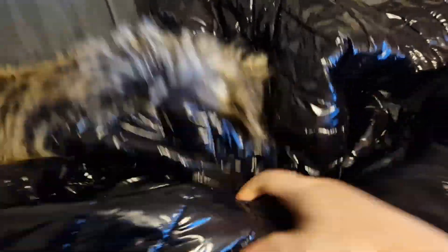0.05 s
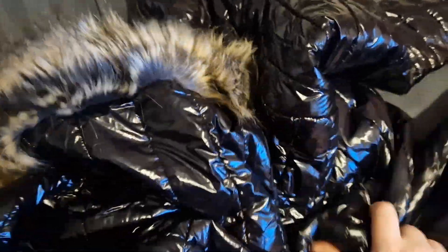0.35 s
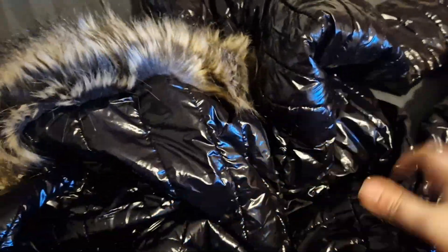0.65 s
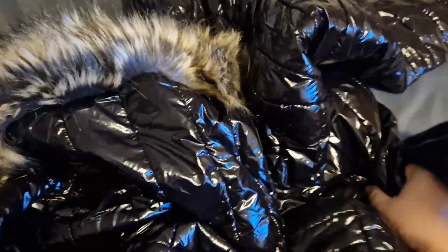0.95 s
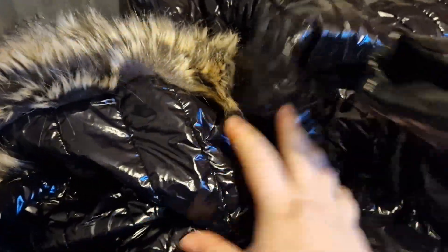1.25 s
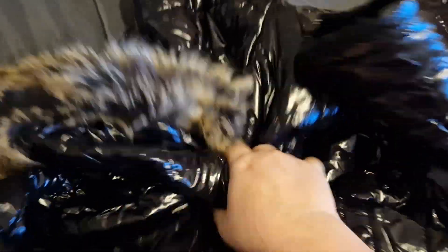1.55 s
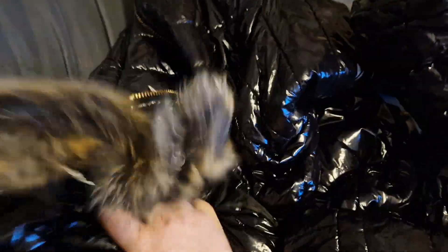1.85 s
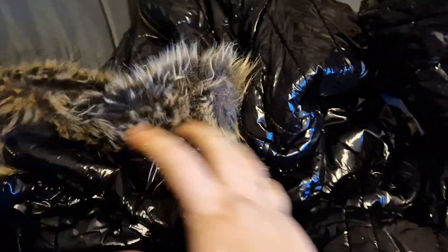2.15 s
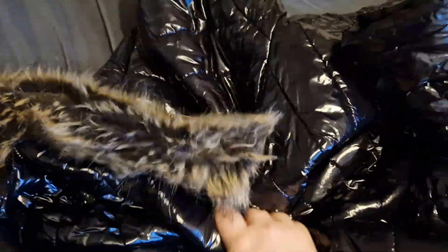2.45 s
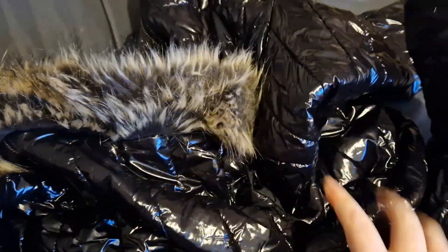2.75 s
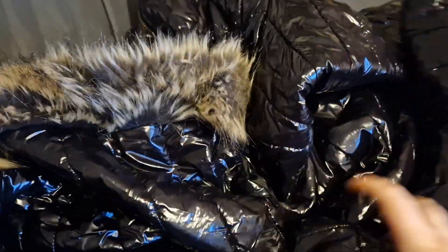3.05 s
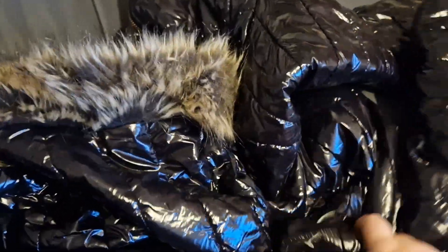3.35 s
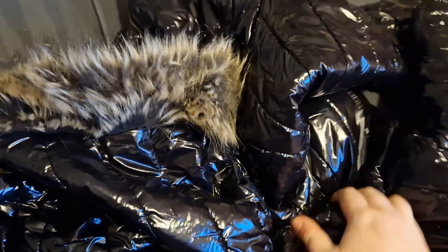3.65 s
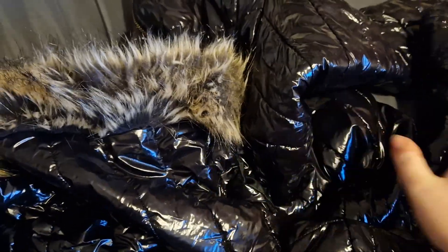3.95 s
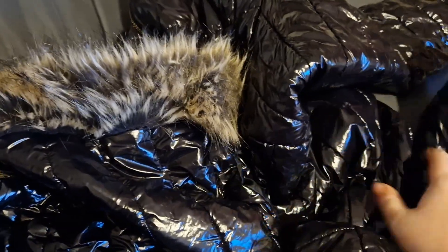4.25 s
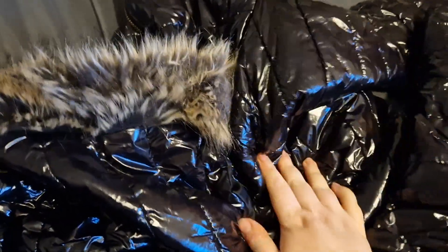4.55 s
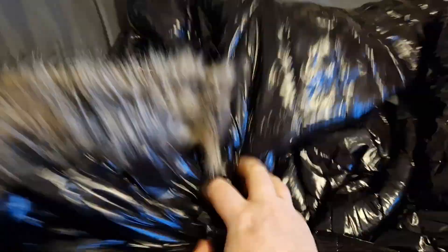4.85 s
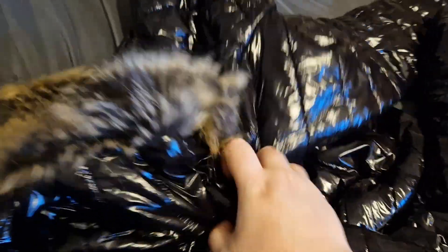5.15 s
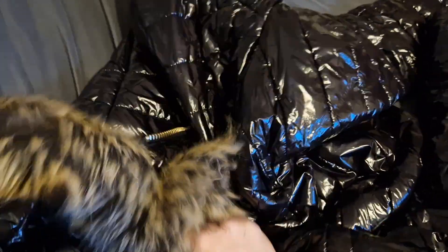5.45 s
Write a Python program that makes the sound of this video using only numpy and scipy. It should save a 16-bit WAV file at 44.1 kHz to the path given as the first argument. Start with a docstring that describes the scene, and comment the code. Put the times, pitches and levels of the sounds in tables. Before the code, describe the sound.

A hand works a glossy puffer jacket very close to the microphone and to the left, in a small, quiet room with hardly any echo. Light rubbing and crinkling open the sound. From about 0.4 seconds, squeezes come roughly twice a second, each a burst of tiny crackles with sharp snaps, a hiss of sliding cloth and dull bumps from the padding. Strong snaps with soft thuds land near 0.4, 1.0, 1.9, 2.4 and 2.9 seconds, with lighter squeezes around 1.4 and 3.3. The fullest crunch and thud comes at about 3.7 seconds, followed by a brief lull at 4.0. Short grabs follow near 4.2, 4.6 and 5.0 seconds, and a last, more hissing one at 5.5. Between the squeezes the fabric keeps rustling and swishing more softly. Tiny, faint squeaks of the sticking coating appear around 0.2, 2.9 and just before 5 seconds.

```python
"""Crinkles, snaps, a hiss and soft thuds: a hand squeezes a glossy puffer jacket about twice a second.
The coated outer cloth buckles in swarms of tiny creases and a few loud snaps. It hisses as it slides
over itself and squeaks where it sticks and slips, while the padding underneath gives way with dull bumps.
The jacket is very close and to the left, in a small room with hardly any echo."""
import sys
import numpy as np
from scipy import signal
from scipy.fft import rfft, irfft, next_fast_len
from scipy.io import wavfile
from scipy.ndimage import uniform_filter1d

SR = 44100
rng = np.random.default_rng(int(sys.argv[2]) if len(sys.argv) > 2 else 0)


def generate_wav(sig):
    """Save sig (samples, or channels by samples) to the path in sys.argv[1] as 16-bit PCM at SR."""
    pcm = np.round(np.clip(np.atleast_2d(sig).T, -1, 1) * 32767).astype(np.int16)
    wavfile.write(sys.argv[1], SR, pcm)


N = 246959


def creases(crease_db, crisp_db, slide_db):
    """The cloth buckles in tiny clicks: dense when it mostly slides, sparser and louder when squeezed."""
    # tone of the crinkle: (frequency [Hz], level [dB])
    crease_colour = [(150, -35), (400, -13.5), (620, -7.5), (950, -2.5), (1420, 2.5), (1800, -1),
                     (2200, -1), (2750, -9), (3800, -4), (5200, -9), (7300, -11.5), (8500, -31.5),
                     (12000, -20.5), (16000, -29)]
    glide_db = np.clip(slide_db - crease_db + 8.5, -4, 10)
    per_s = 320 * from_db(.15 * (crease_db + 46) + glide_db + 3.3 * drift(130))
    crinkle = 0
    for hz in np.geomspace(500, 12000, num=10):
        swarm = clicks(per_s, spread_db=3.5, lag_ms=.09, pan_db=3)
        # tight, crisp cloth favours the small, high creases
        tilt_db = 1.07 * (crisp_db + 8) * np.clip(np.log2(hz / 2200), -1.2, 1.2)
        # the folds keep changing size, so each pitch comes and goes
        wander_db = 1.83 * drift(49)
        crinkle += resonance(swarm, hz, q=2.7) / np.sqrt(hz) * from_db(tilt_db + wander_db)
    return from_db(crease_db) * evened(coloured(crinkle, crease_colour), window_s=0.0273)


def snaps(crease_db, flutter_s=0.0018, crack_s=0.0012):
    """Folds flip over: each one pops, its coating cracks, and the cloth around it flutters briefly."""
    # large folds: (time [s], pop level [dB], pitch [Hz], crack level [dB])
    large_folds = [(0.1607, -15, 3500, -45), (0.166, -13, 2180, -43), (0.3983, -21, 4000, -43),
                   (0.4418, -7, 2770, -23), (0.5418, -12.5, 2840, -52), (0.5766, -17, 2100, -53),
                   (0.818, -25, 1470, -66), (0.9532, 1, 1620, -43), (0.9668, -11, 2640, -37),
                   (0.9862, -9, 2610, -35), (0.9983, -4.5, 2940, -34), (1.012, -8.5, 2610, -29),
                   (1.0658, -14, 3840, -31), (1.0829, -12, 2650, -38), (1.3922, -7, 4000, -31),
                   (1.4318, -5, 3070, -38), (1.7145, -11.5, 2090, -42), (1.7396, -14, 1420, -38),
                   (1.8766, -20.5, 1280, -48), (1.942, -0.5, 1750, -37), (2.0025, -10, 3260, -40),
                   (2.1959, -15, 4000, -28.5), (2.3196, -24.5, 1790, -67), (2.3476, -22, 2670, -49),
                   (2.4081, -17, 2540, -32), (2.4226, -19, 3760, -20.5), (2.452, -2, 2170, -29),
                   (2.7201, -15.5, 1505, -44), (2.7957, -17, 2240, -30), (2.8809, -15, 3330, -30),
                   (2.9359, 3.5, 3700, -25), (2.9612, -9, 2744, -38), (3.2144, -15, 2960, -43),
                   (3.2968, -18, 2900, -27), (3.3999, -13.5, 3600, -37), (3.504, -4.5, 3930, -23.5),
                   (3.6314, -14, 1807, -43), (3.749, 2, 2400, -22), (3.7836, -8, 2040, -41),
                   (3.8765, -17, 1800, -46), (4.0875, -21, 3900, -55), (4.0924, -20.5, 1320, -61),
                   (4.1677, -5, 1980, -40), (4.3125, -19.5, 1252, -60), (4.4068, -14.5, 2150, -49),
                   (4.5218, -14.5, 1810, -42), (4.5824, -6.5, 2720, -37), (4.9199, -19, 1253, -35),
                   (4.9727, -4, 2390, -19.5), (5.0465, -6.5, 3080, -43), (5.3197, -10.5, 1680, -32)]
    out, t = np.zeros((2, N)), np.arange(SR // 16) / SR
    for s, db, hz, crack_db in large_folds + small_folds(crease_db):
        flutter_noise, crack_noise = rng.standard_normal((2, 2, len(t)))
        flutter = rms_one(resonance(flutter_noise, hz, q=0.26)) * np.exp(-t / flutter_s)
        crack = rms_one(resonance(crack_noise, hz=9500, q=0.97)) * np.exp(-t / crack_s)
        fold = from_db(db - 8) * (pop(hz, cycles=0.22) + from_db(-18) * flutter)
        add(out, s, rng.choice([-1, 1]) * (fold + from_db(crack_db + 0.5) * crack))
    return out


def small_folds(crease_db, most_per_s=20, busy_db=-45.5, middle_hz=2600, spread_octaves=0.3):
    """Small folds flip at random, more and louder under a harder hand. Rows match the large folds."""
    effort_db = crease_db - busy_db
    activity = np.minimum(from_db(effort_db), 1)
    at = np.flatnonzero(rng.random(N) < activity * most_per_s / SR)
    strength, pitch = np.clip(rng.standard_normal((2, N)), -2, 2)
    pop_db = -24 + 0.82 * effort_db[at] + 2 * strength[at]
    hz = middle_hz * 2 ** (spread_octaves * pitch[at])
    crack_db = pop_db - 23
    return list(zip(at / SR, pop_db, hz, crack_db))


def sliding(slide_db, sheen=0.3):
    """Cloth slides on cloth: countless slips blur into a hiss, and the folds ring in it by turns."""
    # tone of the hiss: (frequency [Hz], level [dB])
    slide_colour = [(400, -19), (1400, 0.5), (2800, 3.5), (4300, 1), (6200, -4), (7500, 1), (8500, -2.5),
                    (9600, 1), (10800, -3), (12200, 0.5), (13800, -2), (16000, -15)]
    slips = clicks(per_s=16000, spread_db=3.5, lag_ms=0.22, pan_db=0)
    rings = sum(drift(22) * resonance(slips, hz, q=3.8) for hz in (4550, 5540, 7600, 8900, 11150))
    hiss = rms_one(coloured(slips + sheen * rings, slide_colour))
    return from_db(slide_db + 5 + drift(120)) * hiss


def padding(press_db, wander_db=4.5):
    """The filling shifts in dull bumps; pockets of different sizes take turns."""
    # tone of the filling: (frequency [Hz], level [dB])
    padding_colour = [(15, -23), (30, -8), (55, 1), (90, 0), (150, -2.5), (210, -4), (290, -3), (380, -2),
                      (500, -10.5), (800, -10.5), (2000, -16), (8000, -77)]
    bumps = clicks(per_s=700, spread_db=3, lag_ms=0.12, pan_db=0.5)
    pockets = sum(resonance(bumps, hz, q=0.86) * from_db(wander_db * drift(25))
                  for hz in (45, 110, 260, 620))
    return from_db(press_db) * evened(coloured(pockets, padding_colour), window_s=0.0375)


def thuds():
    """A padded pocket gives way with a puff of air, or a finger bumps the jacket."""
    # dull thumps of pockets giving way and fingers bumping the cloth: (time [s], level [dB], pitch [Hz])
    thumps = [(0.272, -37.5, 274), (0.428, -22.5, 106), (0.952, -27, 125), (0.977, -31, 55),
              (1.009, -30, 69), (1.944, -31, 172), (2.42, -28, 129), (2.449, -32, 107.1),
              (2.937, -34.5, 140), (3.085, -35, 350), (3.23, -35.5, 238), (3.66, -35.5, 260),
              (3.734, -28, 218), (3.747, -25.5, 125), (3.75, -28, 225), (4.582, -34.5, 89.5),
              (4.972, -30, 80)]
    out = np.zeros(N)
    for s, db, hz in thumps:
        add(out, s, from_db(db) * pop(hz, cycles=0.31))
    return out


def ticks(ring_hz=12300, ring_s=0.00056, left_db=-6):
    """Very sharp contacts give a short, high ring, louder on the right."""
    # hard contacts: (time [s], level [dB])
    contacts = [(0.428, -9), (0.4412, -26), (3.504, -36)]
    out = np.zeros((2, N))
    tick = from_db([[left_db], [0]]) * pop(ring_hz, cycles=ring_hz * ring_s / 2)
    for s, db in contacts:
        add(out, s, from_db(db) * tick)
    return out


def squeaks(jitter=0.08):
    """The coating sticks and slips evenly for a moment, making a rough, gliding chirp."""
    # squeaks: (time [s], length [s], level [dB], start pitch [Hz], end pitch [Hz])
    chirps = [(0.220, 0.012, -37.5, 1900, 2080), (0.247, 0.012, -38, 1450, 1300),
              (0.397, 0.0025, -27, 7200, 7300), (2.895, 0.013, -37, 11500, 10400),
              (4.815, 0.027, -40.5, 4700, 4470), (4.977, 0.037, -35.5, 1250, 2120)]
    out = np.zeros(N)
    for s, length, db, start_hz, end_hz in chirps:
        count = int(length * SR)
        hz = np.geomspace(start_hz, end_hz, count) * (1 + jitter * drift(560)[:count])
        tone = np.sqrt(2) * np.sin(2 * np.pi * np.cumsum(hz) / SR)
        add(out, s, from_db(db) * np.hanning(count) * tone)
    return out


def hand(settle_s=0.021, set_off_s=0.0046):
    """How the hand works the cloth over time: creasing, sliding, pressing and crispness, all in dB."""
    # the fist closes: (tightest time [s], closing [s], build-up [dB], release [s],
    # creasing [dB], sliding [dB], pressing [dB], crispness [dB])
    squeezes = [(0.432, 0.033, 6, 0.099, -31, -39, -38, -4), (0.963, 0.066, 14, 0.12, -33, -43, -35.5, -3),
                (1.430, 0.084, 14, 0.17, -37, -42, -40, -6),
                (1.948, 0.073, 12, 0.097, -35.5, -43, -38, -5.5),
                (2.436, .032, 7.5, 0.091, -33.5, -38, -35, -7.5),
                (2.938, 0.057, 6.5, 0.071, -34.5, -40.5, -37, -4.5),
                (3.317, 0.02, -2, 0.076, -34, -42.5, -37, -3.5),
                (3.743, 0.042, 15.5, 0.045, -30.5, -41, -34, -6.5),
                (4.176, 0.054, 15.5, 0.043, -33.5, -46.5, -40, -4.5),
                (4.581, 0.062, 13.5, 0.031, -34.5, -45.5, -40.5, -7),
                (4.977, 0.062, 7, 0.1, -33.5, -42, -39, -7), (5.507, 0.057, 11.5, 0.073, -37, -38, -38, -5)]
    # the hand shifts between squeezes: (time [s], length [s], swell [dB],
    # creasing [dB], sliding [dB], pressing [dB], crispness [dB])
    rubs = [(0.000, 0.029, -5, -46.5, -57.5, -52, -5), (0.063, 0.19, 0, -51, -53.5, -54.5, -8),
            (0.144, 0.16, 1, -44, -48.5, -49.5, -5.5), (0.315, 0.089, 3, -48.5, -53, -50.5, -8.5),
            (0.487, 0.057, 7, -44.5, -55.5, -50, -8.5), (0.631, 0.13, -0.5, -47, -52.5, -55, -6),
            (1.061, 0.22, -1.5, -49, -53, -52.5, -3.5), (1.464, .080, -4, -42, -48, -50, -6.5),
            (1.65, 0.099, 11.5, -45, -50.5, -55, -8), (2.169, 0.075, 0, -44.5, -50, -47, -7.5),
            (2.346, .055, -4, -51, -69, -53, -9.5), (2.486, 0.053, -5, -43.5, -50.5, -51, -2),
            (2.674, 0.14, -1, -46, -48, -53, -6), (3.077, 0.084, -4.5, -44.5, -48.5, -56, -9),
            (3.166, 0.073, 6, -44, -49.5, -55, -2), (3.487, 0.049, 1, -41.5, -46, -49.5, -5),
            (3.561, 0.099, -1, -42.5, -56, -55, -5), (3.780, 0.075, -7, -51.5, -54.5, -54, -4.5),
            (3.900, 0.061, 4.5, -44, -53.5, -48, -5.5), (4.095, 0.015, -5, -45.5, -59, -51, -9),
            (4.215, .060, 0, -61, -60.5, -61, -5), (4.349, 0.17, -6, -47, -53.5, -54.5, -5.5),
            (4.74, 0.1, -7, -47.5, -52.5, -57.5, -4), (5.021, 0.051, 5.5, -44, -53, -53, -4),
            (5.212, 0.12, 7, -47, -50.5, -51, -6)]
    # the hand stops: (time [s], length [s], drop [dB])
    rests = [(0.295, 0.016, 10), (0.802, 0.088, 10), (1.295, .046, 5), (1.795, 0.069, 9.5),
             (2.055, 0.088, 3), (2.288, 0.058, 11.5), (4.006, 0.0836, 15), (4.289, 0.025, 3.5),
             (4.865, .034, 7.5), (5.117, .085, 3.5), (5.357, 0.081, 7)]
    # light touch between moves: (creasing [dB], sliding [dB], pressing [dB])
    touch_db = (-59.5, -59.5, -60)
    t = np.arange(0, N / SR, .001)
    moves = [(squeeze(t, s, closing, build, release), levels, crisp)
             for s, closing, build, release, *levels, crisp in squeezes]
    moves += [(rub(t, s, length, swell), levels, crisp) for s, length, swell, *levels, crisp in rubs]
    power = np.array([from_db(np.add.outer(levels, shape)) ** 2 for shape, levels, _ in moves])
    # the move that creases most has the most say in the crispness
    crease_power = power[:, 0]
    crisp_db = np.dot([crisp for *_, crisp in moves], crease_power) / crease_power.sum(axis=0)
    rest_db = sum(np.interp(t, [s - settle_s, s, s + length - set_off_s, s + length], [0, drop, drop, 0])
                  for s, length, drop in rests)
    levels_db = 10 * np.log10(power.sum(axis=0) + from_db(touch_db)[:, None] ** 2) - rest_db
    return [np.interp(np.arange(N) / SR, t, curve) for curve in (*levels_db, crisp_db)]


def squeeze(t, peak_s, closing_s, build_db, release_s, tight_s=0.013, grip_db_per_s=910):
    """Level in dB as the fingers grab, tighten, hold and let go, falling 20 dB in each release time."""
    early = np.maximum(peak_s - t, 0)
    late = np.maximum(t - peak_s - tight_s / 2, 0)
    slack = np.interp(early, [tight_s / 2, closing_s], [0, 1])
    return -build_db * slack - grip_db_per_s * np.maximum(early - closing_s, 0) - 20 * late / release_s


def rub(t, start_s, length_s, swell_db, arch_db=4.5, in_db_per_s=337, out_db_per_s=543):
    """Level in dB as the hand brushes the cloth: a low, leaning arch that fades fast at both ends."""
    along = np.clip(2 * (t - start_s) / length_s - 1, -1, 1)
    fade_in_db = in_db_per_s * np.maximum(start_s - t, 0)
    fade_out_db = out_db_per_s * np.maximum(t - start_s - length_s, 0)
    return swell_db * along / 2 - arch_db * along ** 2 - fade_in_db - fade_out_db


def room_echo(x, fade_s=0.1, band_hz=(350, 4500)):
    """The nearby walls send back a short, dull wash of sound, different on each side."""
    t = np.arange(SR // 3) / SR
    tail = rng.standard_normal((2, len(t))) * from_db(-60 * t / fade_s) * (t > .003)
    tail /= np.sqrt(np.sum(tail ** 2) / 2)
    tail = signal.sosfilt(signal.butter(1, band_hz, "band", fs=SR, output="sos"), tail)
    return signal.fftconvolve(x.mean(axis=0)[None], tail, axes=1)[:, :N]


def from_the_left(left, right, lag_ms=.07):
    """The microphone's body boosts its left side and shades its right; the two paths differ a little."""
    # how much more openly the left side faces the jacket: (frequency [Hz], left over right [dB])
    left_lead = [(100, 2.5), (380, 1.5), (700, 4.5), (1290, 10.5), (2380, 11.5), (4400, 9.5), (7500, 7.5),
                 (10300, 5), (12200, -2), (14000, 4), (16000, -10)]
    left = np.pad(left, (round(lag_ms * SR / 1000), 0))[:N]
    return np.array([coloured(left, left_lead, amount=0.26), coloured(right, left_lead, amount=-0.7)])


def room_air(level_db=-62):
    """The still air of the room: a faint, low rush, partly the same on both sides."""
    # tone of the air: (frequency [Hz], level [dB])
    room_colour = [(15, -10), (35, 1), (52, 7.5), (73, -12), (110, -10), (300, -11.5), (1500, -19),
                   (6000, -27.5), (16000, -31)]
    noise = rng.standard_normal(N) + 0.75 * rng.standard_normal((2, N))
    return from_db(level_db) * rms_one(coloured(noise, room_colour))


def pop(hz, cycles):
    """A patch of cloth flips and swings back: a quick pulse that is fullest after `cycles` swings."""
    turns = np.arange(SR // 16) / SR * hz
    age = turns / cycles
    return -age * np.exp(1 - age) * np.sin(2 * np.pi * turns + 0.51)


def clicks(per_s, spread_db, lag_ms, pan_db):
    """Random clicks of uneven size. Each comes from its own spot, so left and right can differ."""
    at = np.flatnonzero(rng.random(N) < per_s / SR)
    size = np.minimum(rng.exponential(1, N), 5)
    sign = rng.choice([-1, 1], N)
    place, side = rng.standard_normal((2, N))
    height = sign[at] * from_db(spread_db * size[at])
    lag = np.round(lag_ms * SR / 1000 * (place[at] - .5)).astype(int)
    lean = from_db(pan_db * side[at] / 2)
    out = np.zeros((2, N))
    out[0, at] = height * lean
    out[1, np.clip(at + lag, 0, N - 1)] = height / lean
    return out


def resonance(x, hz, q):
    """Let through the sound near one pitch; a higher q rings longer."""
    angle = 2 * np.pi * min(hz, .45 * SR) / SR
    damp = np.sin(angle) / (2 * q)
    return signal.lfilter([damp, 0, -damp], [1 + damp, -2 * np.cos(angle), 1 - damp], x + 1e-18)


def coloured(x, curve, amount=1):
    """Shape the tone with a curve of (frequency [Hz], level [dB]), its levels multiplied by `amount`."""
    size = 2 * next_fast_len(N // 2 + SR // 4)
    hz, db = np.transpose(curve)
    bin_hz = np.maximum(np.arange(size // 2 + 1) * SR / size, 1)
    gain = from_db(amount * np.interp(np.log(bin_hz), np.log(hz), db))
    # minimum phase: the filter rings only after a click, never before it
    cepstrum = irfft(np.log(gain))
    cepstrum[1:size // 2] *= 2
    cepstrum[size // 2 + 1:] = 0
    return irfft(rfft(x, size) * np.exp(rfft(cepstrum, size)))[..., :N]


def evened(x, window_s):
    """Keep the loudness steady without smoothing away the fine grain."""
    power = uniform_filter1d(np.mean(x, axis=0) ** 2, int(window_s * SR))
    return x / np.sqrt(np.abs(power) + np.mean(power) / 1000)


def drift(turns_per_s):
    """A random curve that wanders about 1 either side of zero."""
    knots = rng.standard_normal(4096)
    return np.interp(np.arange(N) / SR * turns_per_s, np.arange(len(knots)), knots) * np.sqrt(3 / 2)


def from_db(db):
    """Turn decibels into a gain."""
    return 10 ** (np.asarray(db) / 20)


def rms_one(x):
    """Scale a sound to an average power of 1."""
    return x / np.sqrt(np.mean(x ** 2) + 1e-20)


def add(track, s, sound):
    """Mix a short sound into a track, starting at `s` seconds."""
    start = max(round(s * SR), 0)
    track[..., start:start + sound.shape[-1]] += sound[..., :N - start]


def scene():
    """The hand works the jacket, close and to the left, in the quiet room."""
    crease_db, slide_db, press_db, crisp_db = hand()
    fits_db = 1.45 * drift(45)   # the cloth gives way in fits and starts
    crisp_db += 2.5 * drift(25)   # the treble of the creases comes and goes
    cloth = creases(crease_db + fits_db, crisp_db, slide_db) + sliding(slide_db)
    cloth += padding(press_db + fits_db) + squeaks() + snaps(crease_db)
    left, right = cloth + from_db(-12.5) * room_echo(cloth)
    return from_the_left(left, right) + thuds() + ticks() + room_air()


def record(dry, cutoff_hz=16100):
    """Cut off the very highest treble steeply."""
    return signal.sosfilt(signal.ellip(10, .1, 80, cutoff_hz, fs=SR, output="sos"), dry)


dry = scene()
out = record(dry)
generate_wav(out)
```